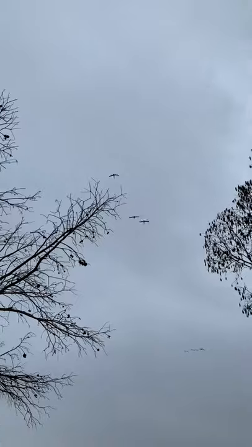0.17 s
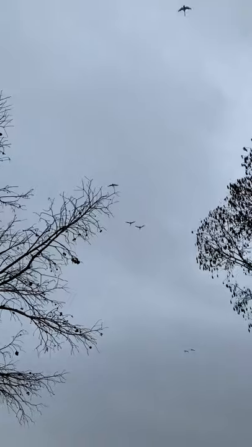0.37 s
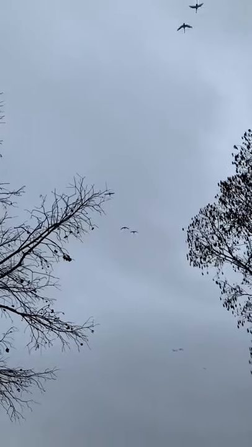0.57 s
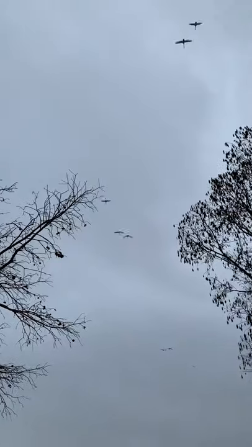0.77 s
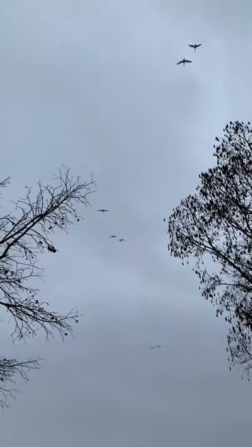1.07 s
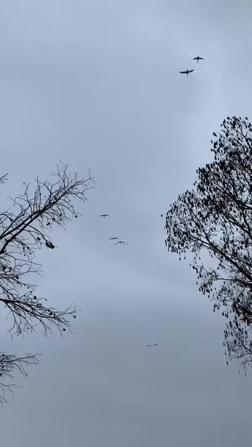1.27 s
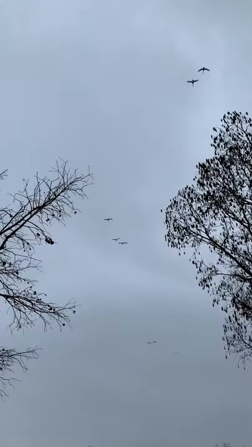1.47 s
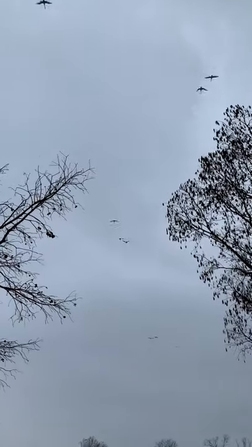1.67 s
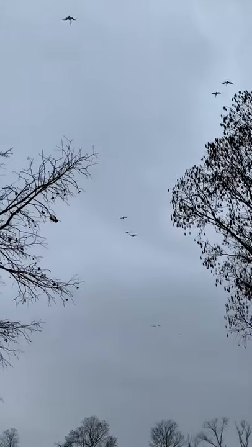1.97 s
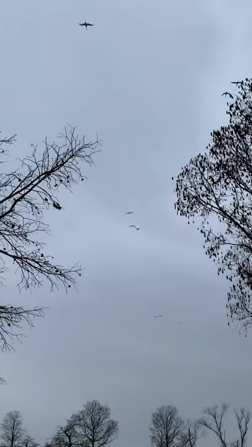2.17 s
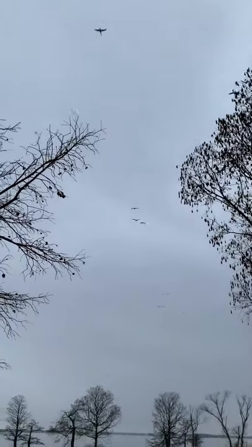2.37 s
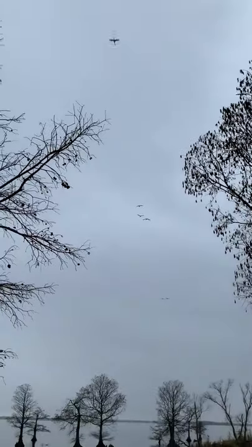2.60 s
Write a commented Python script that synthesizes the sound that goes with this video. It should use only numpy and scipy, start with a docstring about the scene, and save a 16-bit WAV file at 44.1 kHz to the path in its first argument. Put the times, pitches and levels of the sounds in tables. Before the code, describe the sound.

Overlapping nasal honks of passing swans, a far flock chorusing behind, over soft wind and low rumble.

```python
"""Nearer swans whoop at once in arched, overlapping honks above the chorus of a far flock; each is a harmonic stack.
Under them, filtered noise makes a light wind that buffets the phone, still air, and a low rumble that swells
in the second half; gliding sines make two soft thumps.
A small bird chips three times with two gliding tones, and one hoarse, fluttering cry comes late.
The trees of a lake shore scatter the birds' voices as decaying stereo noise."""
import sys
import numpy as np
from scipy import signal
from scipy.fft import rfft, irfft
from scipy.io import wavfile

SR = 44100
rng = np.random.default_rng(int(sys.argv[2]) if len(sys.argv) > 2 else 0)


def generate_wav(signal):
    """Clip the signal to [-1, 1] and save it as 16-bit WAV at the path in sys.argv[1]."""
    frames = np.transpose(np.atleast_2d(signal))
    scaled = np.clip(frames, -1, 1) * 32767
    pcm = np.round(scaled).astype(np.int16)
    wavfile.write(sys.argv[1], SR, pcm)


N = 120834


def undb(db):
    """Amplitude ratio: 20 dB is a factor of ten."""
    return 10 ** (np.asarray(db) / 20)


def unit(x):
    """Normalization: scale to rms 1."""
    return x / np.sqrt(np.mean(x ** 2) + 1e-20)


def curve(rows):
    """Linear interpolation of (time [s], value) rows over the scene."""
    return np.interp(np.arange(N) / SR, *np.array(rows).T)


def shape(rows, hz):
    """Logarithmic frequency scale: interpolate (frequency [Hz], value) rows along it."""
    table_hz, values = np.array(rows).T
    return np.interp(np.log(hz + 1), np.log(table_hz), values)


def walk(rate, size):
    """Band-limited random fluctuation: normal draws, rate per second, joined by straight lines."""
    at = np.arange(size) / SR * rate
    return np.interp(at, np.arange(1024), rng.standard_normal(1024))


def add(out, start, x):
    """Superposition: mix a sound in at its start time in seconds."""
    at = int(start * SR)
    lo, hi = max(at, 0), min(at + len(x), N)
    if hi > lo:
        out[lo:hi] += x[lo - at:hi - at]


def stereo_noise(width, size):
    """Partial coherence: a shared mid and an opposed side (width = side against mid) make white noise."""
    mid, side = rng.standard_normal((2, size))
    return np.array([mid + width * side, mid - width * side])


def coloured(rows, width):
    """Spectral shaping: weight white stereo noise by a spectrum, at overall rms 1."""
    gain = undb(shape(rows, np.fft.rfftfreq(N, 1 / SR)))
    return unit(irfft(rfft(stereo_noise(width, N)) * gain, N))


TREES_T60_S, TREES_TREBLE_T60_S, TREES_BUILDUP_S = 0.45, 0.14, 0.011
TREES_SPLIT_HZ, ECHO_WIDTH = 2500, 0.68


def trees(x):
    """Diffuse scattering from trunks and water: the echo builds up, then decays, the treble dying first."""
    t = np.arange(SR) / SR
    scatter = stereo_noise(ECHO_WIDTH, SR)
    low = signal.sosfilt(signal.butter(2, TREES_SPLIT_HZ, fs=SR, output="sos"), scatter)
    high = signal.sosfilt(signal.butter(2, TREES_SPLIT_HZ, "high", fs=SR, output="sos"), scatter)
    # amplitude falls a thousandfold (60 dB) in one T60
    low_tail = low * np.exp(-np.log(1000) * t / TREES_T60_S)
    high_tail = high * np.exp(-np.log(1000) * t / TREES_TREBLE_T60_S)
    tail = (low_tail - high_tail) * (1 - np.exp(-t / TREES_BUILDUP_S))
    return signal.fftconvolve(x[None], unit(tail) / np.sqrt(SR), axes=1)[:, :N]


ATTACK_S, RELEASE_S = 0.023, 0.0096
WAVER, WAVER_PER_S = 0.0032, 47.2  # fraction of the pitch, draws per second
JITTER, JITTER_PER_S = .04, 600  # fraction of the pitch at roughness 1, draws per second
EFFORT_POWER = .9


def voice(length, pitches, gains, rough):
    """Harmonic series on an arched pitch: overtones open at full effort, and uneven cycles smear them."""
    size = int(length * SR)
    t = np.arange(size) / SR
    u = t / length
    first, middle, last = pitches
    # parabola through the start, middle and end pitches
    hz = first * (1 - u) * (1 - 2 * u) + middle * 4 * u * (1 - u) + last * u * (2 * u - 1)
    hz = hz * (1 + WAVER * walk(WAVER_PER_S, size) + JITTER * rough * walk(JITTER_PER_S, size))
    turn = np.exp(2j * np.pi * np.cumsum(hz) / SR)
    attack = np.sin(np.pi / 2 * np.minimum(t / ATTACK_S, 1))
    release = np.sin(np.pi / 2 * np.clip((length - t) / RELEASE_S, 0, 1))
    # powers of the rotating phasor are the harmonics, from the second up
    overtones = np.polyval(np.append(gains[:0:-1], [0, 0]), turn).imag
    overtones = overtones * (1 + rough * walk(2 * JITTER_PER_S, size))
    effort = np.sin(np.pi * u) ** EFFORT_POWER
    return np.sqrt(2) * attack * release * (gains[0] * turn.imag + overtones * effort)


# Response of the windpipe to overtones, against the fundamental: (frequency [Hz], level [dB])
WINDPIPE = [(1200, -14), (1600, -8), (2000, -12.5), (2400, -13), (3100, -14), (3900, -15.5), (4700, -29.5),
            (5800, -32.5), (7500, -44), (11000, -76.5)]
NASAL_HZ, NASAL_WIDTH_HZ = 2550, 570
UNEVEN_DB = 2.2  # per octave above the second harmonic, times a random factor


def honk(length, pitches, overtones_db, bright_db, rough, nasal_db=0, count=14):
    """Source and filter: the long windpipe shapes the overtones, and its nasal resonance lifts some calls."""
    k = np.arange(2, count + 1)
    hz = k * pitches[1]
    nasal = nasal_db * np.exp(-((hz - NASAL_HZ) / NASAL_WIDTH_HZ) ** 2)
    uneven = UNEVEN_DB * rng.uniform(-0.44, 1, len(k)) * np.log2(k / 2)
    tilt = bright_db * np.log2(k / np.e)
    upper = undb(shape(WINDPIPE, hz) + nasal + overtones_db + tilt + uneven)
    return voice(length, pitches, np.append(1, upper), rough)


# Honks of the nearer swans: (start [s], length [s], start pitch [Hz], middle pitch [Hz], end pitch [Hz],
# level [dB], overtones [dB], brightness [dB per octave], roughness [0-1], nasal resonance [dB])
NEAR_HONKS = [ (0.04, 0.1, 690, 694, 625, -54, -2, -30, 0, -3),
              (.1, 0.17, 809, 776.7, 711.5, -44.5, -17.5, 5, 0, 12),
              (0.277, 0.078, 740, 802.4, 798, -45.5, -10, 0, 0.1, 9.5),
              (0.261, 0.13, 746, 709.5, 716.5, -50.5, -6, 0, 0.06, 16),
              (0.25, 0.24, 656, 593, 561, -56, -7, -1.5, 0.1, 11),
              (.35, .1, 881, 852, 808, -48.5, -18, 8.5, 0.2, -1),
              (0.357, 0.16, 692.6, 635.6, 584, -51, 0, -0.5, .2, 2.5),
              (0.451, 0.16, 1006, 943, 890, -53, 0, -2, .2, 7.5),
              (0.459, 0.19, 1038, 1029, 1002, -54, -19.5, -5, 0.3, -6.5),
              (0.5, 0.18, 761.6, 765, 800, -46.5, -7, 5, .3, 0.5),
              (.62, 0.13, 880, 850, 819, -49, -4, -1.5, 0.42, 2.5),
              (.75, 0.16, 882, 870, 836, -48.5, -12, -7.5, 0.28, 8.5),
              (0.847, .155, 800, 790, 748.5, -41.5, -5.5, -2.5, 0, 11),
              (0.914, 0.051, 1125, 1066, 1083, -53, -19, -12, 0, -1),
              (1.02, 0.24, 872.5, 797.3, 771, -46, -15.5, 1, 0.4, 2),
              (1.103, 0.12, 1110, 1098, 1070, -60, -7, -16.5, 0.4, 6),
              (1.188, 0.1, 683, 698.3, 637, -54.5, 6.5, -12.5, 0.12, -3),
              (1.223, 0.18, 791.7, 768, 725.5, -52, -5, 0, 0, 15.5),
              (1.315, 0.19, 691, 636, 588, -53, -7.5, -11, 0, -3.5),
              (1.475, 0.32, 1006, 1022, 954, -52, 0.5, -9, 0.42, 1),
              (1.484, 0.3, 879.4, 900, 859, -53, -4.5, -13, 0.48, 1.5),
              (1.553, 0.2093, 663, 681.3, 671.4, -39.5, -11, -3.5, 0.07, 11.5),
              (1.641, 0.11, 772, 737, 703, -47, -1, -2, 0, -6.5),
              (1.715, 0.093, 699, 661.4, 600, -53, -5.5, 1, 0.22, 12),
              (1.874, 0.19, 735.7, 770.8, 778, -46.5, -5, 8, 0.23, 8),
              (2.003, 0.082, 674, 665, 630, -53, -7.5, 3.5, 0.2, 0),
              (2.037, 0.095, 787.5, 804.8, 763, -41.5, -2, 0, 0.08, 5),
              (2.151, 0.071, 1130, 1089, 1042, -55.5, -11, 4, 0, 4.5),
              (2.212, 0.13, 925, 905, 854, -48.5, -13.5, -12, 0.3, 3),
              (2.278, 0.16, 802.7, 798.6, 754, -49, -13.5, -3.5, 0.32, 9.5),
              (2.361, .15, 993, 1004, 1013, -57, -6, -7, 0.25, 5.5),
              (2.476, 0.15, 612.7, 662.7, 740, -59, 11, -7.5, 0, -9),
              (2.598, 0.06, 915, 941.3, 902, -44, 6.5, -1.5, 0.16, 0.5),
              (2.652, 0.12, 826.6, 758, 720, -43, -31, 11.5, 0.2, -3)]


def near_swans():
    """Superposition of single calls: the overlapping honks of the birds overhead."""
    out = np.zeros(N)
    for start, length, first, middle, last, db, overtones_db, bright_db, rough, nasal_db in NEAR_HONKS:
        call = honk(length, (first, middle, last), overtones_db, bright_db, rough, nasal_db)
        add(out, start, undb(db) * call)
    return out


# Level of the far flock with its echo: (time [s], level [dB])
FLOCK_LEVEL = [(.06, -40.5), (.25, -47), (.42, -42.5), (.7, -44.5), (.88, -43), (1.05, -46), (1.4, -44),
               (1.62, -43), (1.88, -43), (2.2, -43), (2.5, -45.5), (2.7, -40.5)]
FLOCK_PER_S, FLOCK_LEAD_S = 70, .3  # calls begin before the scene
FLOCK_HZ, FLOCK_SPREAD = 807, .25  # centre, and greatest departure in log pitch
FLOCK_LENGTH_S = .17  # centre; lengths scatter by half an octave either way
FLOCK_RISE, FLOCK_FALL = 0.01907, 0.0841  # mean fractions of the middle pitch
FLOCK_OVERTONES_DB, FLOCK_BRIGHT_DB, FLOCK_ROUGH = -6, -1.5, .33
OFF_PITCH_DB, FLOCK_ECHO_DB = 12, -6.5  # loss at the pitch extremes; echo


def far_flock():
    """Incoherent summation of many distant birds, each at its own pitch; extreme voices are weaker."""
    out = np.zeros(N)
    count = int(FLOCK_PER_S * (N / SR + FLOCK_LEAD_S))
    for i, (when, pitch, long, fall) in enumerate(rng.uniform(-1, 1, (count, 4))):
        hz = FLOCK_HZ * np.exp(FLOCK_SPREAD * pitch)
        first = hz * (1 - FLOCK_RISE * (1 + 2 * long * fall))
        last = hz * (1 - FLOCK_FALL * (1 + fall))
        length = FLOCK_LENGTH_S * 2 ** (long / 2)
        call = honk(length, (first, hz, last), FLOCK_OVERTONES_DB, FLOCK_BRIGHT_DB, FLOCK_ROUGH, count=9)
        start = (i + when / 2) / FLOCK_PER_S - FLOCK_LEAD_S
        add(out, start, call * undb(-OFF_PITCH_DB * pitch ** 2))
    return unit(out + undb(FLOCK_ECHO_DB) * trees(out)) * undb(curve(FLOCK_LEVEL))


# Relative spectrum of wind on the microphone: (frequency [Hz], level [dB per Hz])
WIND_SPECTRUM = [(15, -20.5), (35, -5.5), (55, 4.5), (90, 5), (140, -11), (250, -21), (500, -40.5),
                 (2000, -64), (9000, -87.5)]
# Stronger buffets: (time of peak [s], width between 1/e points [s], level [dB])
WIND_BUFFETS = [(0.089, 0.13, -47), (.38, 0.16, -59), (.69, 0.03, -43), (.51, 0.043, -55),
                (1.851, 0.088, -64.5), (2.062, 0.05, -57.5), (2.55, 0.15, -58)]
WIND_DB, GUST_DB, GUSTS_PER_S = -60, 1.5, 25
LOW_WIDTH = 0.55  # side against mid, wind and rumble


def wind():
    """Turbulent pressure on the microphone: a restless low flutter with a few stronger buffets."""
    t = np.arange(N) / SR
    force = undb(WIND_DB + GUST_DB * walk(GUSTS_PER_S, N))
    for at, length, db in WIND_BUFFETS:
        force = force + undb(db) * np.exp(-(2 * (t - at) / length) ** 2)
    return coloured(WIND_SPECTRUM, LOW_WIDTH) * force


# Relative spectrum of the low rumble: (frequency [Hz], level [dB per Hz])
RUMBLE_SPECTRUM = [(25, -22.5), (70, -13), (110, -1.5), (145, 1), (170, -9.5), (215, -4.5), (280, -17),
                   (450, -20), (900, -63.5), (3000, -68)]
# Level of the low rumble: (time [s], level [dB])
RUMBLE_LEVEL = [(0, -64), (.85, -66.5), (1.2, -64), (1.52, -68), (1.64, -60.5), (1.9, -53), (2.3, -56.5),
                (2.55, -59), (2.74, -58.5)]


def rumble():
    """Amplitude modulation of low-frequency noise: a rumble that swells in the second half."""
    return coloured(RUMBLE_SPECTRUM, LOW_WIDTH) * undb(curve(RUMBLE_LEVEL))


# Relative spectrum of the still air: (frequency [Hz], level [dB per Hz])
AIR_SPECTRUM = [(100, -7.5), (450, -0.5), (1500, 5.5), (3000, -9), (4500, -36.5), (7000, -37.5),
                (10000, -32.5), (15500, -32)]
AIR_DB, AIR_WIDTH = -59, 0.69  # level, side against mid


def still_air():
    """Stationary noise: a steady, faint background."""
    return coloured(AIR_SPECTRUM, AIR_WIDTH) * undb(AIR_DB)


# Soft low thumps: (start [s], length [s], mid pitch [Hz], level [dB])
SOFT_THUMPS = [(0.068, 0.089, 114.7, -51.5), (0.674, 0.05, 89.8, -55.5)]
THUMP_SAG = 0.23  # fraction of the pitch, above at the start and below at the end


def thumps():
    """Transient low oscillation whose pitch sags: dull knocks of air or handling on the phone."""
    out = np.zeros(N)
    for start, length, hz, db in SOFT_THUMPS:
        u = np.arange(int(length * SR)) / (length * SR)
        phase = 2 * np.pi * np.cumsum(hz * (1 + THUMP_SAG * (1 - 2 * u))) / SR
        add(out, start, undb(db) * unit(np.sin(phase) * np.sin(np.pi * u) ** 2))
    return out


# Chips of the small bird: (start [s], level [dB])
BIRD_CHIPS = [(0.161, -63.5), (1.181, -71), (2.074, -69.5)]
# Pitch of each chip, leaping up and sliding down: (time after its start [s], frequency [Hz])
CHIP_GLIDE = [(0, 4400), (.005, 5900), (.012, 6150), (.028, 5550), (.039, 4600)]
CHIP_SECOND_RATIO, CHIP_SECOND_DB = 1.1, -11.5  # pitch and level of the second tone
CHIP_FLUTTER, CHIP_ECHO_DB = 0.018, -2.5  # fraction of the pitch; echo


def small_bird():
    """Two-source phonation: both sides of the syrinx sing thin chips at slightly different pitches."""
    times, glide = np.array(CHIP_GLIDE).T
    t = np.arange(int(times[-1] * SR)) / SR
    hz = np.interp(t, times, glide) * (1 + CHIP_FLUTTER * walk(JITTER_PER_S, len(t)))
    phase = 2 * np.pi * np.cumsum(hz) / SR
    tones = np.sin(phase) + undb(CHIP_SECOND_DB) * np.sin(CHIP_SECOND_RATIO * phase)
    chip = unit(tones * np.sin(np.pi * t / times[-1]))
    out = np.zeros(N)
    for start, db in BIRD_CHIPS:
        add(out, start, undb(db) * chip)
    return out + undb(CHIP_ECHO_DB) * trees(out)


# The hoarse cry: (start [s], length [s], start pitch [Hz], end pitch [Hz])
HOARSE_CRY = (2.525, .09, 790, 830)
# Upper resonances of its throat: (centre [Hz], width [Hz], level [dB])
HOARSE_THROAT = [(1590, 270, -3.5), (2554, 100, 10), (3140, 210, 8.5), (4140, 300, -28)]
HOARSE_DB, HOARSE_ROUGH = -46, .5
FLUTTER_HZ, FLUTTER_DEPTH = 118, .8


def hoarse_cry():
    """Amplitude modulation and resonance: a slow second vibration chops a rising voice; its throat rings."""
    start, length, first, last = HOARSE_CRY
    source = voice(length, (first, (first + last) / 2, last), np.ones(5), HOARSE_ROUGH)
    t = np.arange(len(source)) / SR
    source = source * (1 + FLUTTER_DEPTH * np.sin(2 * np.pi * FLUTTER_HZ * t)) ** 2
    cry = np.zeros(len(source))
    for centre, width, db in HOARSE_THROAT:
        b, a = signal.iirpeak(centre, centre / width, fs=SR)
        cry += undb(db) * signal.lfilter(b, a, source)
    out = np.zeros(N)
    add(out, start, undb(HOARSE_DB) * unit(cry))
    return out


# Phase by which the left microphone port leads the right: (frequency [Hz], phase [radians])
PORT_PHASE = [(100, 0), (550, -.55), (1000, -.55), (1650, -.2), (2050, -1.5), (2400, -2.7), (2850, -3.4),
              (3600, -4.4), (4700, -3.1), (5600, -1.7), (6800, 0), (8200, 1.7), (15000, 1.5)]


def ports(x, slant):
    """Interaural-style phase difference: the two ports hear the sound out of step, by a share (slant)."""
    lead = slant * shape(PORT_PHASE, np.fft.rfftfreq(N, 1 / SR))
    return irfft(rfft(x) * np.exp(.5j * np.array([lead, -lead])), N)


NEAR_SLANT, NEAR_ECHO_DB = .85, -9  # share of the port phase for the birds overhead; their echo
VOICE_LOW_HZ = 490


def scene():
    """Superposition: birds and echoes reach the ports out of step; wind, thumps, rumble and air lie beneath."""
    near = near_swans() + hoarse_cry()
    around = undb(NEAR_ECHO_DB) * trees(near) + far_flock() + small_bird()
    birds = ports(near, NEAR_SLANT) + ports(around, 1)
    birds = signal.sosfilt(signal.butter(10, VOICE_LOW_HZ, "high", fs=SR, output="sos"), birds)
    return birds + wind() + rumble() + still_air() + thumps()


START_S, OPENING_S, TOP_HZ = .058, .005, 15700


def record(dry):
    """Band limitation: the phone opens after a moment of silence and cuts the top."""
    opening = np.clip((np.arange(N) / SR - START_S) / OPENING_S, 0, 1)
    return signal.sosfilt(signal.ellip(8, .2, 70, TOP_HZ, fs=SR, output="sos"), dry * opening)


dry = scene()
out = record(dry)
generate_wav(out)
```